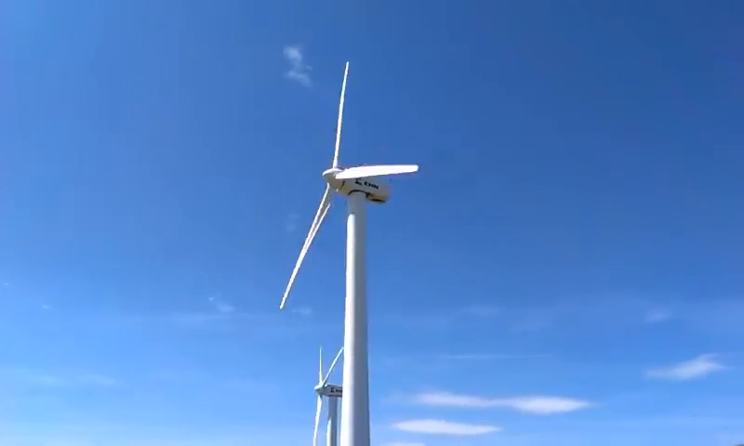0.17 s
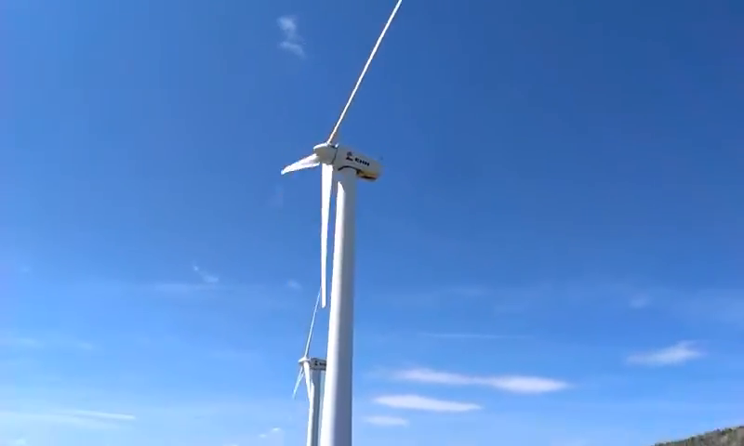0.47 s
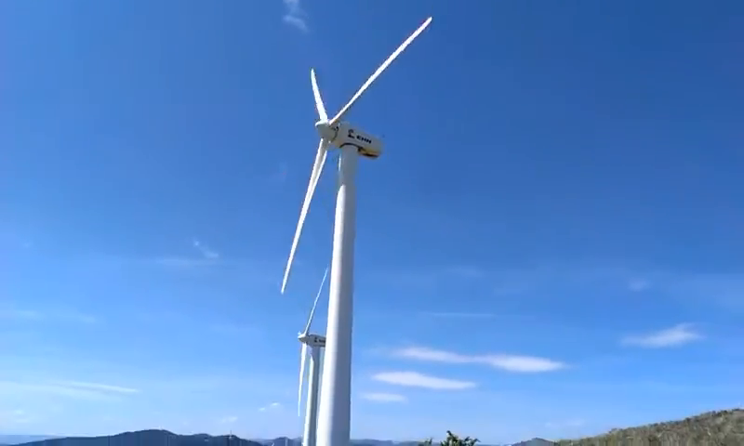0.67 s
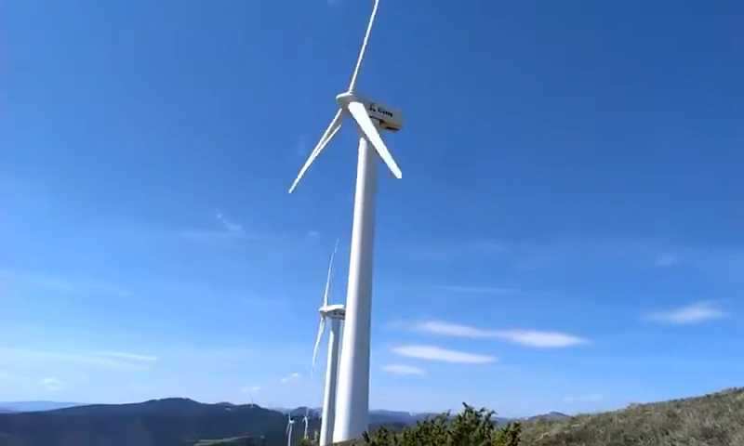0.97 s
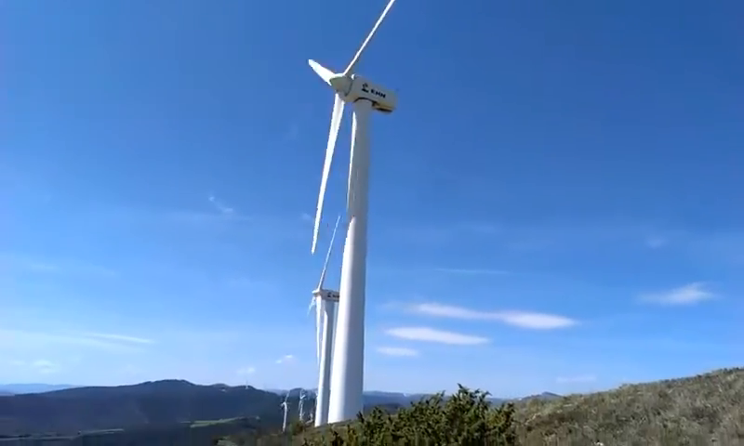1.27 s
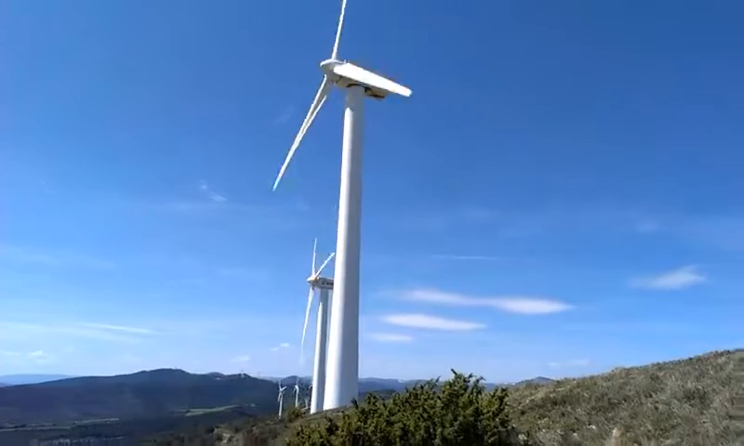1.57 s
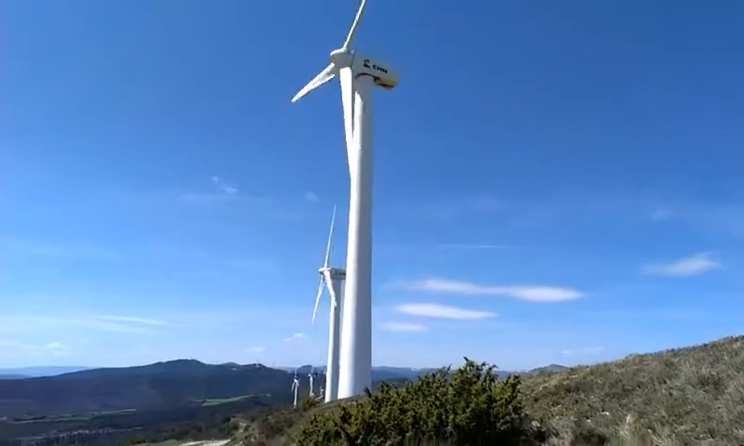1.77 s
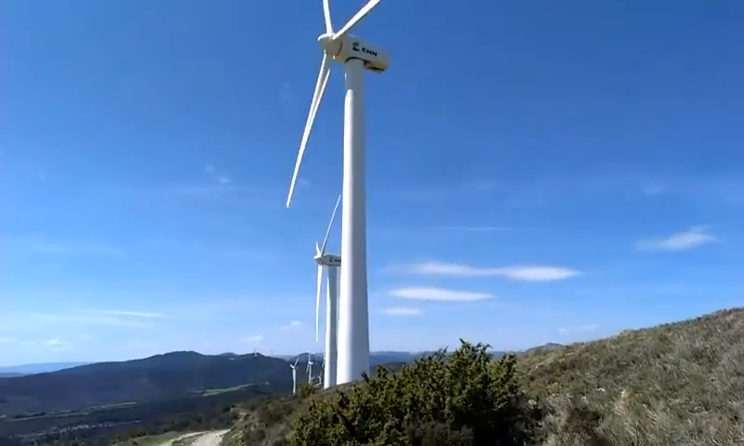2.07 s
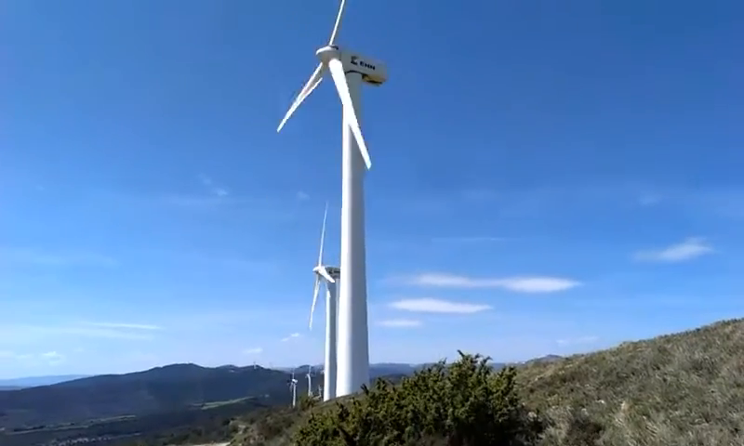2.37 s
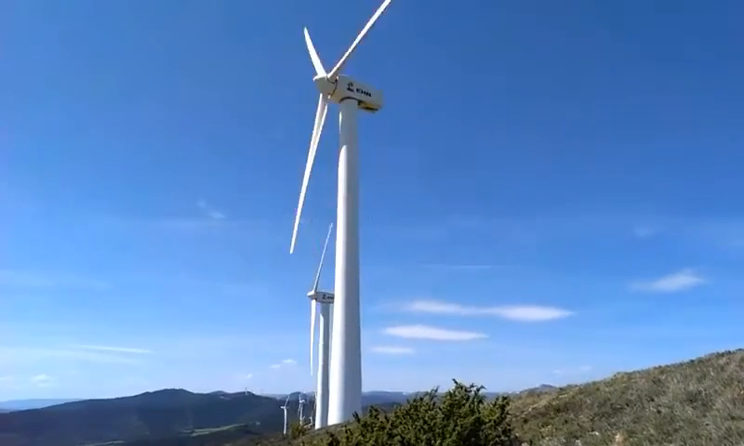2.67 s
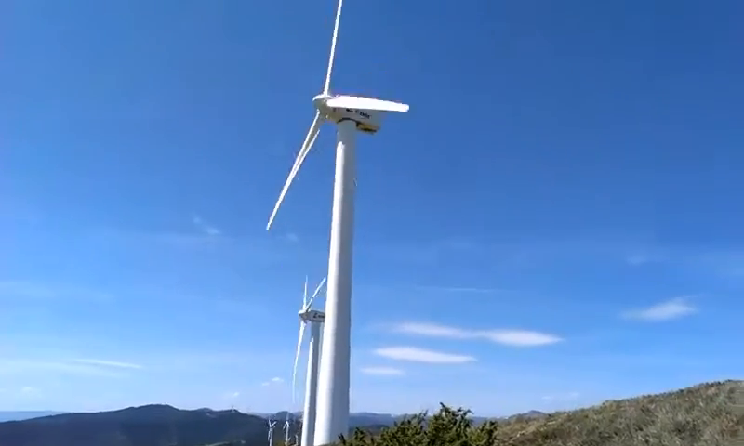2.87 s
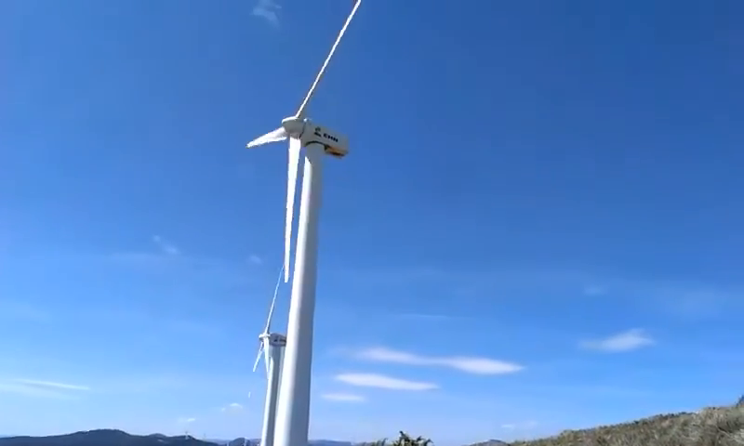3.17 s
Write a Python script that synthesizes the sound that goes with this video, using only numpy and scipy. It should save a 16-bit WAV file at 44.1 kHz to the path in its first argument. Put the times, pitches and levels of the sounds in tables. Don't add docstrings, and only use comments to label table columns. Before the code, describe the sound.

Irregular gusts rumble and pop close on an unshielded microphone outdoors, loudest and sharpest at first; behind them are faint blade swishes, a soft whistle and grass hiss, then a late brush rustle.

```python
import sys
import numpy as np
from scipy import signal
from scipy.fft import rfft, irfft, next_fast_len
from scipy.io import wavfile
from scipy.ndimage import uniform_filter1d

SR = 44100
rng = np.random.default_rng(int(sys.argv[2]) if len(sys.argv) > 2 else 0)


def wav_record(signal):
    frames = np.transpose(np.atleast_2d(signal))
    bounded = np.clip(frames, -1, 1)
    quanta = np.round(bounded * 32767).astype(np.int16)
    wavfile.write(sys.argv[1], SR, quanta)


def boost(x):
    u = np.asarray(x, float) / 20
    return 10 ** u


N = 145971

# time in seconds, flutter level in dB, rumble level in dB,
# brightness in dB per octave.
GUSTS = [(0, -26.5, -19.5, 3.5), (.28, -28.5, -27, 1), (.56, -27.5, -29.5, -1), (.66, -32, -38.5, -1.5),
         (.76, -29, -27.5, -0.5), (.96, -28, -28.5, -1.5), (1.15, -31.5, -31.5, -1), (1.32, -32, -29, 0.5),
         (1.52, -32, -31.5, -1.5), (1.95, -33.5, -25, -2), (2.06, -41, -41.5, -1.5), (2.26, -23, -25.5, -3),
         (2.39, -42.5, -35, -1.5), (2.56, -27.5, -24, -1), (2.7, -33.5, -33.5, -4.5),
         (2.87, -22, -25.5, -2.5), (3.1, -31, -30, -2), (3.31, -23, -31, -2.5)]
# frequency in Hz, level in dB.
FLUTTER_COLOUR = [(41, -19.5), (70, -29), (135, -2.5), (183, -0.5), (273, -1.5), (732, -22.5), (1500, -35),
                  (1950, -40.5), (3300, -120)]
# frequency in Hz, level in dB.
RUMBLE_COLOUR = [(8.8, -40.5), (15, 2.5), (110, 2.5), (140, -11.5), (240, -120)]
# time in seconds, peak in dB, pitch in Hz.
LARGE_EDDIES = [(0.015, -8, 201), (0.056, -8.5, 127.2), (0.112, -23, 272), (0.184, -5.5, 208),
                (0.254, -17, 205), (0.276, -11.5, 393), (0.33, -9, 259), (0.381, -9.5, 173),
                (0.448, -10, 235), (0.482, -9.5, 253), (0.545, -5, 224), (0.593, -12, 223),
                (0.659, -34.5, 185), (0.724, -8.5, 185), (0.773, -11.5, 314), (0.801, -9.5, 205),
                (0.852, -3.5, 179), (0.91, -15.5, 253), (0.996, -12.5, 240), (1.048, -8.5, 214),
                (1.085, -8, 187), (1.139, -8, 213), (1.159, -11.5, 180), (1.21, -8.5, 306),
                (1.23, -23.5, 230), (1.276, -3, 297), (1.366, -14.5, 129), (1.437, -9.5, 197),
                (1.48, -11, 270), (1.555, -9, 217), (1.595, -13.5, 128), (1.621, -16, 156),
                (1.671, -11, 350), (1.8, -16, 203.4), (1.84, -8.5, 148), (1.878, -12, 162),
                (1.94, -14.5, 183), (1.965, -12, 135), (2.042, -18.5, 198), (2.119, -17.5, 169),
                (2.165, -16, 129), (2.223, -11.5, 165), (2.25, -8.5, 175), (2.274, -27, 197),
                (2.311, -16, 166), (2.436, -18.5, 191), (2.513, -9.5, 176), (2.568, -9, 192),
                (2.619, -10.5, 186), (2.683, -16.5, 226), (2.744, -9, 218), (2.776, -11.5, 133),
                (2.821, -7.5, 248), (2.846, -12, 248), (2.97, -17, 153), (3.018, -6.5, 235),
                (3.145, -8, 129.6), (3.194, -9.5, 235), (3.218, -5.5, 224), (3.238, -6, 317),
                (3.297, -9, 250)]
# time in seconds, peak in dB, pitch in Hz, snap relative to peak in dB.
SMALL_EDDIES = [(0.022, -15.5, 600, -17), (0.037, -20.5, 694, -3), (0.072, -15, 781, -17.5),
                (0.079, -18, 623, -3.5), (0.151, -22, 477, -14), (0.181, -20, 565, -16),
                (0.204, -25.5, 520, -6), (0.232, -21.5, 456, -22), (0.257, -25, 825, -46),
                (0.286, -20.5, 515, -6), (0.328, -23, 503, -16.5), (0.414, -18, 525, -29),
                (0.429, -23.5, 637, -14.5), (0.455, -24.5, 566, -13), (0.488, -25.5, 445, -27.5),
                (0.523, -32, 510, -15.5), (0.536, -24.5, 540, -32), (0.579, -30, 743, -27),
                (0.665, -33, 450, -20.5), (0.724, -28.5, 460, -15), (0.776, -21, 680, 0),
                (0.803, -15.5, 484, -24), (0.857, -15, 470, -22), (0.915, -27, 460, -25.5),
                (1.037, -24, 456, -18), (1.088, -28, 554, -40.5), (1.118, -23, 510, -25.5),
                (1.137, -27, 560, -5.5), (1.213, -16, 710, -9), (1.233, -26, 450, -17),
                (1.276, -14, 490, -18), (1.481, -28.5, 432, -31), (1.56, -26, 430, -18),
                (1.805, -36, 456, -22), (1.821, -22, 690, -21), (1.94, -22.5, 420, -10.5),
                (1.973, -24, 430, -26), (2.124, -31.5, 426, -15), (2.25, -29, 470, -27),
                (2.312, -29, 454, -26.5), (2.519, -21, 533, -14.5), (2.573, -24, 498, -17.5),
                (2.821, -22, 435, -25), (2.85, -27.5, 573, -35), (2.869, -29, 570, -14),
                (2.902, -20, 513, -27), (2.927, -24.5, 519, -30), (2.956, -28, 450, -15),
                (3.02, -21, 435, -22), (3.157, -21.5, 527, -10), (3.195, -22.5, 414, -19),
                (3.238, -25.5, 470, -27)]
# time in seconds, peak in dB.
HOUSING_TICKS = [(0.265, -68), (0.2792, -56.5), (0.7789, -49), (0.9256, -73), (1.0885, -65), (1.2117, -51),
                 (1.2766, -55), (1.822, -56.5), (2.247, -53.5), (2.5192, -52), (2.857, -60)]
# time in seconds, level in dB.
BLADE_SWISH = [(0, -65), (.55, -60), (.66, -53.5), (1.02, -50), (1.12, -62), (1.36, -53), (1.68, -55),
               (2.0, -57), (2.45, -56), (2.6, -50.5), (2.95, -49.5), (3.31, -59.5)]
# frequency in Hz, level in dB.
BLADE_COLOUR = [(240, -58.5), (400, -9), (1180, 5), (1270, 5), (1370, 4), (2240, 0.5), (4000, -18.5),
                (5200, -60.5), (8800, -120)]
# time in seconds, pitch in Hz, level in dB.
BLADE_WHISTLE = [
    (2.4, 1860, -110),
    (2.6, 1980, -68),
    (2.72, 2100, -53.5),
    (2.9, 2250, -45),
    (3.05, 2340, -53.5),
    (3.22, 2430, -53.5),
    (3.3, 2460, -73),
]
# start in seconds, length in seconds, level in dB.
HISS_SPELLS = [(0.91, 0.11, -68.5), (1.31, .11, -69), (1.422, 0.11, -62), (1.581, 0.083, -62.5),
               (1.724, 0.046, -65), (1.814, .03, -61), (2.004, 0.11, -67), (2.136, 0.22, -72),
               (2.328, 0.084, -64.5), (2.467, 0.086, -66.5), (2.585, 0.23, -73.5)]
# frequency in Hz, level in dB.
GRASS_COLOUR = [(3000, -8), (4900, -7), (5960, 0), (7700, -3), (9800, -22), (16000, -26)]
# time in seconds, level in dB, sheen relative to the rustle in dB.
BRUSH_RUSTLE = [
    (2.91, -76.5, -47),
    (2.948, -57, -29),
    (2.975, -41.5, -23),
    (3.03, -40, -50),
    (3.13, -43, -50),
    (3.205, -32.5, -55),
    (3.225, -35.5, -52),
    (3.26, -41, -40),
    (3.31, -32, -28),
]
# frequency in Hz, level in dB.
BRUSH_COLOUR = [(1760, -42.5), (3000, -16), (3120, -17), (4100, -6), (5760, -7), (6190, -3), (7200, -4),
                (8800, -8.5), (11000, -20.5), (12000, -37), (16000, -49), (22000, -120)]
# frequency in Hz, level in dB.
SHEEN_COLOUR = [(9000, -26.5), (12000, -4), (14000, 0.5), (17000, -9)]
# frequency in Hz, threshold in dB per band.
GATE_THRESHOLDS = [(1700, -74), (2500, -71), (3300, -74), (3800, -71), (4400, -73.5), (6500, -77.5),
                   (9000, -71), (12000, -81)]


def unit(x):
    return x / np.sqrt(np.mean(x ** 2))


def curve(table, column=1):
    table = np.array(table, float)
    return np.interp(np.arange(N) / SR, table[:, 0], table[:, column])


def colour(points, lo_hz=0, hi_hz=30000):
    size = next_fast_len(N)
    f = np.arange(size // 2 + 1) * SR / size + 1
    p = np.array(points, float)
    gain = boost(np.interp(np.log(f), np.log(p[:, 0]), p[:, 1]))
    gain = gain * (f > p[0, 0] / 2) * (f < p[-1, 0] * 2)
    edge = np.sqrt(1 / (1 + (f / hi_hz) ** 6) - 1 / (1 + (f / (lo_hz + 1e-9)) ** 6))
    return irfft(rfft(rng.standard_normal(size)) * gain * edge, size)[:N]


def walk(rate):
    hold = int(SR / rate)
    levels = np.repeat(rng.standard_normal(N // hold + 1), hold)[:N]
    return unit(uniform_filter1d(uniform_filter1d(levels, hold), hold))


def add_eddy(out, s, db, hz, cycles, phase):
    width = max(cycles, .3) / hz / 2
    reach = int(3 * width * SR)
    k = np.arange(-reach, reach)
    i = np.clip(int((s + width) * SR) + k, 0, N - 1)
    bell = np.exp(-(k / SR / width) ** 2)
    out[i] += boost(db) * bell * np.cos(2 * np.pi * hz * k / SR + phase)


def random_phases(count):
    return rng.random(count) * 2 * np.pi


def wake():
    wake_db, wake_s = -13.5, 0.0094
    t, out = np.arange(N) / SR, np.zeros(N)
    for s, db, _ in LARGE_EDDIES:
        near = slice(max(int((s - .06) * SR), 0), int((s + .08) * SR))
        out[near] += boost(db + wake_db) * np.exp(-((t[near] - s - wake_s) / wake_s) ** 2)
    return out


def flutter():
    patch_db, crackle_db, flick_db = 2.5, 2.5, 3
    patch, crackle = walk(28), walk(110)
    slices = []
    for octave in np.arange(-1.5, 3):
        hz = 250 * 2 ** octave
        crackle_share = np.clip(.5 + 0.089 * octave, 0, 1.2)
        together = patch_db * patch + crackle_db * crackle * crackle_share
        swing = unit(boost(together + flick_db * walk(min(hz / 6, 90))))
        tilt = boost(octave * curve(GUSTS, column=3))
        slices.append(colour(FLUTTER_COLOUR, hz / np.sqrt(2), hz * np.sqrt(2)) * swing * tilt)
    return unit(sum(slices)) * np.hypot(boost(curve(GUSTS)), wake())


def rumble():
    gust = boost(curve(GUSTS, column=2) + 2.0 * walk(9.5))
    return unit(colour(RUMBLE_COLOUR)) * np.hypot(gust, 0.69 * wake())


def spikes(count=580):
    level_db, spread_db, calm_db = 4, 3, -1.5
    lowest_hz, octaves = 220, 2.0
    out = np.zeros(N)
    gust = np.hypot(boost(curve(GUSTS) + calm_db), wake())
    bright = curve(GUSTS, column=3)
    for when, pitch, size, phase in rng.random((count, 4)):
        i = int(when * N)
        up = pitch * octaves
        db = level_db - spread_db * np.log(1 - .97 * size) + up * (bright[i] - 3.5)
        add_eddy(out, i / SR, db, lowest_hz * 2 ** up, 1.25, 2 * np.pi * phase)
    return out * gust


def large_eddies():
    out = np.zeros(N)
    for (s, db, hz), phase in zip(LARGE_EDDIES, random_phases(len(LARGE_EDDIES))):
        add_eddy(out, s, db - 7.5, hz, 1.7, phase)
    return out


def small_eddies():
    small_db, snap_db, snap_hz, snap_delay_s = 9, -0.5, 1700, 0.0025
    out = np.zeros(N)
    for (s, db, hz, snap), phase in zip(SMALL_EDDIES, random_phases((len(SMALL_EDDIES), 2))):
        suck = np.pi + .3 * (phase[0] - np.pi)
        add_eddy(out, s, db + small_db, hz, .9, suck)
        add_eddy(out, s + snap_delay_s, db + snap + snap_db, snap_hz, 1.15, phase[1])
    return out


def housing_ticks():
    out = np.zeros(N)
    for (s, db), phase in zip(HOUSING_TICKS, random_phases(len(HOUSING_TICKS))):
        add_eddy(out, s, db + 15.5, 4750, 1.1, phase)
    return out


def turbine():
    swish = unit(colour(BLADE_COLOUR)) * boost(curve(BLADE_SWISH) + 4 + .7 * walk(9))
    breath_hz = 600
    turn = 2 * np.pi * np.cumsum(curve(BLADE_WHISTLE)) / SR
    tone = np.sin(turn) * walk(breath_hz)
    tone = tone + boost(-12.5) * np.sin(turn / 2) * walk(breath_hz / 2)
    return swish + tone * boost(curve(BLADE_WHISTLE, column=2))


def grass():
    edge_s, bed_db = 0.014, -81.5
    t = np.arange(N) / SR
    level = boost(bed_db) * np.ones(N)
    for s, length, db in HISS_SPELLS:
        inside = np.minimum(t - s, s + length - t)
        level += boost(db) * np.clip(inside / edge_s + .5, 0, 1)
    return unit(colour(GRASS_COLOUR)) * level * boost(0.5 * walk(22))


def brush():
    level_db, grain_db = -0.75, 1.3
    sheen = unit(colour(SHEEN_COLOUR)) * boost(curve(BRUSH_RUSTLE, column=2))
    level = boost(curve(BRUSH_RUSTLE) + level_db + grain_db * walk(70))
    return (unit(colour(BRUSH_COLOUR)) + sheen) * level


def scene():
    port = flutter() + rumble() + spikes() + large_eddies() + small_eddies() + housing_ticks()
    return (port + turbine() + grass() + brush())[None]


def limit(x):
    peak = .41
    return peak * np.tanh(x / peak)


def masking_gate(x):
    follows_loudness, band_hz, tick_opens_db, soft_db = 0.89, 290, 15.5, .5
    lead = 208
    f, t, z = signal.stft(np.r_[np.zeros(lead), x], SR, nperseg=2048, noverlap=1024)
    power = np.abs(z) ** 2 + 1e-18
    p = np.array(GATE_THRESHOLDS, float)
    loud = 10 * np.log10(power.sum(axis=0))
    follow = follows_loudness * (loud - np.median(loud))
    tick_s = np.array(HOUSING_TICKS)[:, 0]
    jolt = (np.abs(t[:, None] - tick_s) < 512 / SR).any(axis=1)
    band = (f / band_hz) ** .9 // 1
    for b in np.unique(band[f > p[0, 0]]):
        rows = band == b
        centre = f[rows].mean()
        edge = np.interp(np.log(centre), np.log(p[:, 0]), p[:, 1]) + follow
        edge = edge - tick_opens_db * jolt * (centre < 7800)
        level = 10 * np.log10(power[rows].sum(axis=0))
        z[rows] *= np.clip((level - edge) / soft_db + .5, 0, 1)
    return signal.istft(z, SR, nperseg=2048, noverlap=1024)[1][lead:N + lead]


def low_pass(x):
    return signal.sosfilt(signal.butter(12, 15500, fs=SR, output="sos"), x)


def record(dry):
    mix = masking_gate(limit(dry[0]))[None]
    return low_pass(mix)


dry = scene()
out = record(dry)
wav_record(out)
```